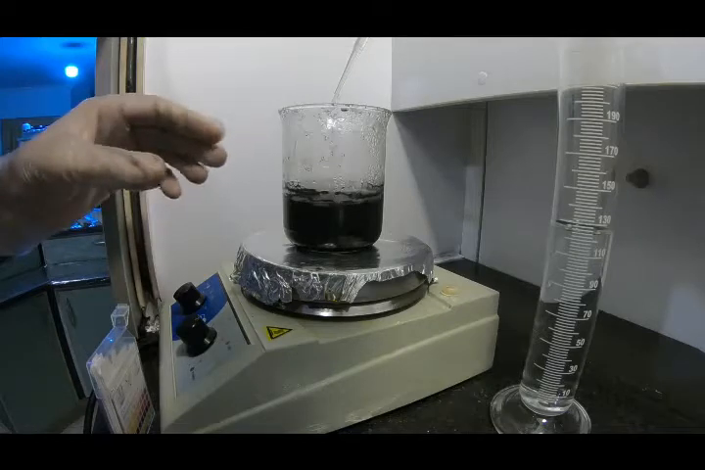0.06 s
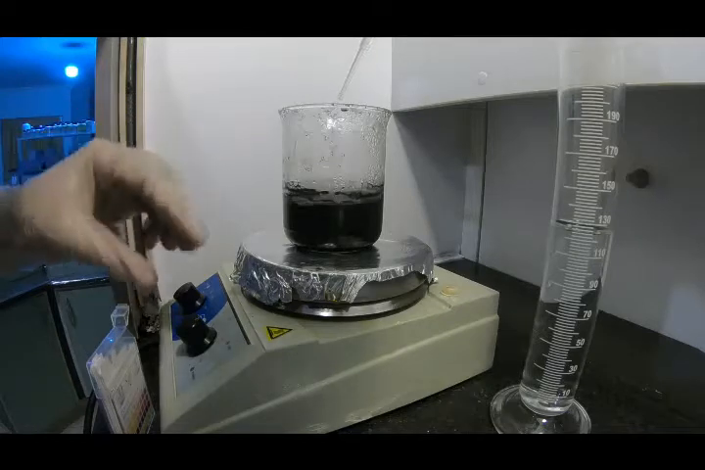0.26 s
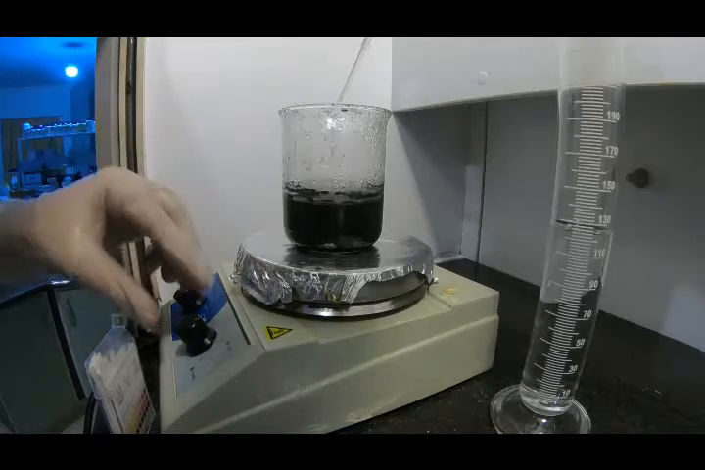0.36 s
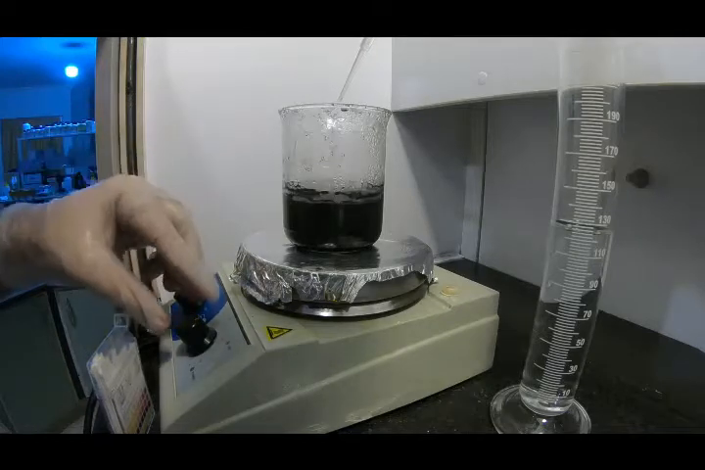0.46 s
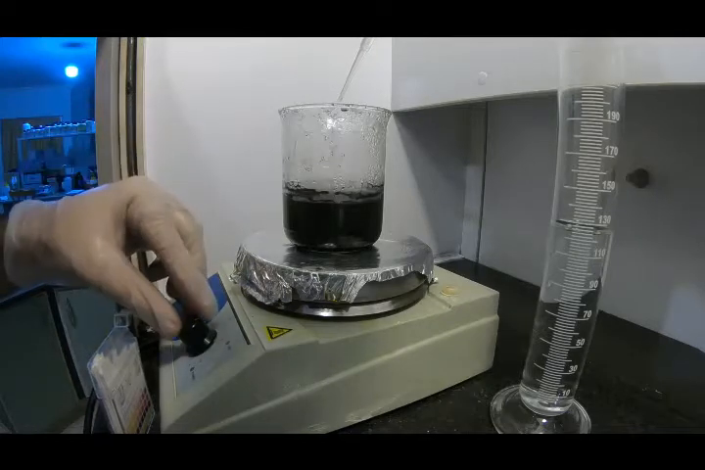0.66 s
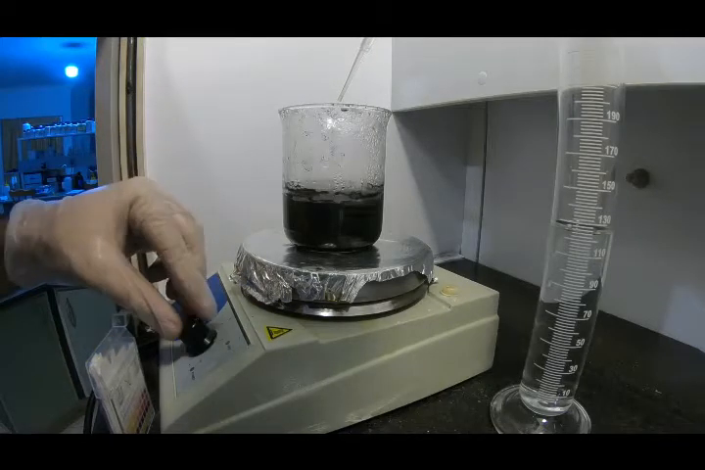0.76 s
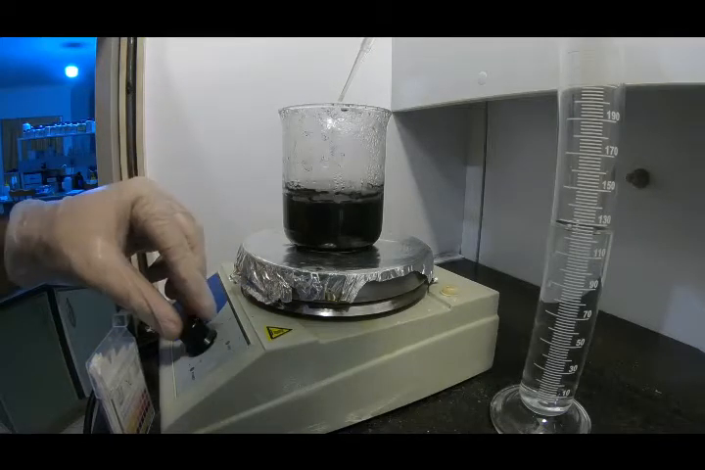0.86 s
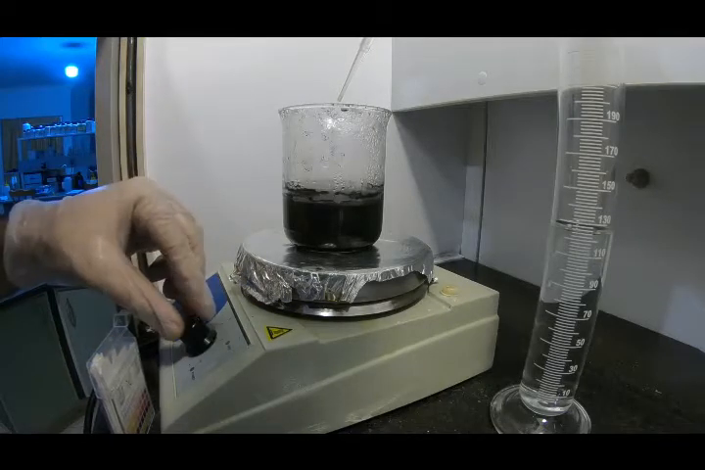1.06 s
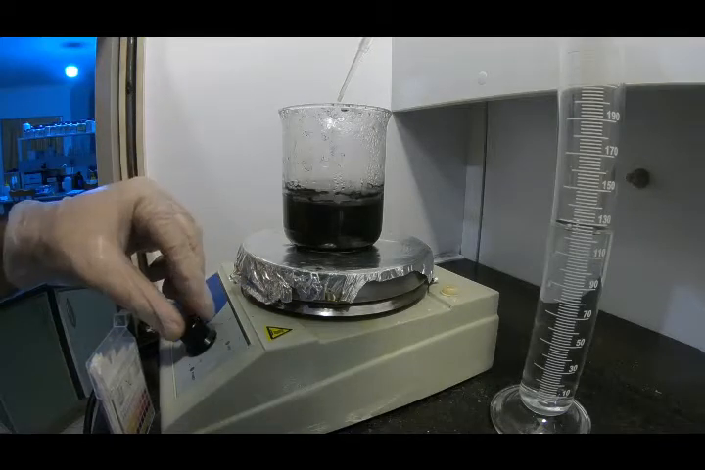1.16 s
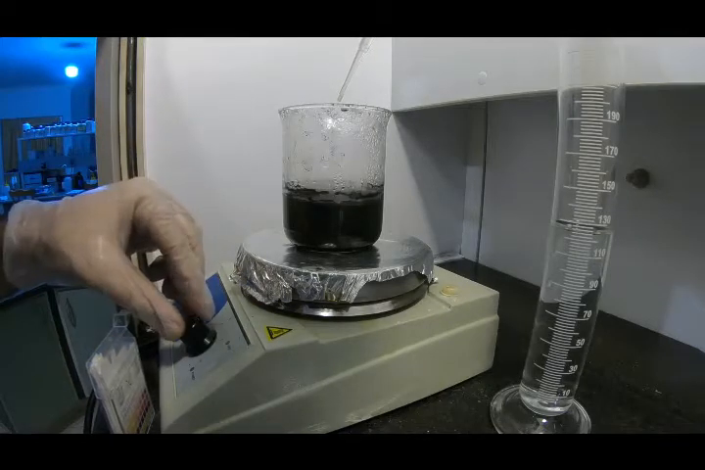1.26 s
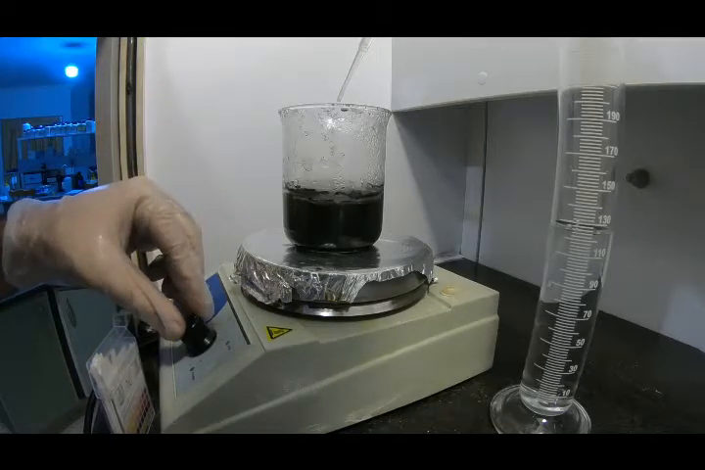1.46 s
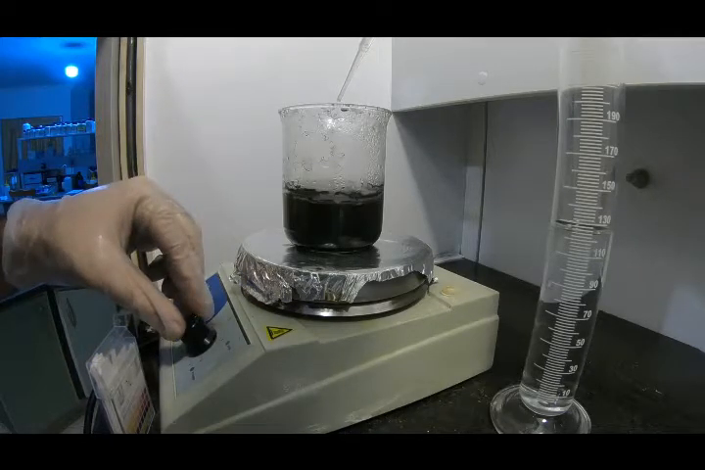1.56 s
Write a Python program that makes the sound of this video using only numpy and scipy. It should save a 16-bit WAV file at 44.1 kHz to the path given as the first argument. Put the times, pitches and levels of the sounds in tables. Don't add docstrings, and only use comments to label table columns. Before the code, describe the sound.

Glass beaker clinks from a tumbling stirring bar: light, quick ticks from 0 to 0.4 s, firmer clinks at 0.46 and 0.59 s, softer knocks to 0.8 s, then the loudest bright cluster at 0.84-1.0 s. A clear clink at 1.13 s, sparse faint taps and a tiny glassy squeak near 1.43 s follow. Unsteady low motor hum and faint fan hiss continue throughout, in a close, hard-walled space.

```python
import sys
import numpy as np
from scipy import signal
from scipy.fft import rfft, irfft, next_fast_len
from scipy.io import wavfile
from scipy.ndimage import map_coordinates

SR = 44100
rng = np.random.default_rng(int(sys.argv[2]) if len(sys.argv) > 2 else 0)


def invert_db(level):
    return 10 ** (np.asarray(level, dtype=float) / 20)


def transcribe(signal):
    frames = np.atleast_2d(signal).T
    limited = np.clip(frames, -1, 1)
    pcm = np.round(limited * 32767).astype(np.int16)
    wavfile.write(sys.argv[1], SR, pcm)


N = 70560

# start_s [s], level_db [dB]
SHAKE_LEVEL = [(0.0, -56), (0.016, -60), (0.208, -62), (0.23, -57.5), (0.342, -58), (0.378, -49.5),
               (0.49, -52.5), (0.524, -63), (0.588, -58.5), (1.016, -50.5), (1.108, -68), (1.162, -52),
               (1.314, -63), (1.6, -72)]
# pitch_hz [Hz], lead [radians]
LEFT_LEAD = [(145, 2.21), (550, 2), (850, 2.35), (1200, 2.5)]
# pitch_hz [Hz], left_over_right_db [dB]
BACKGROUND_PAN = [(30, -8), (60, -8), (150, -3), (350, -1), (800, -4), (1500, -.5), (8000, 0.5)]


def unit(x):
    return x / np.sqrt(np.mean(x ** 2) + 1e-20)


def along(points, hz):
    point_hz, value = np.transpose(points)
    return np.interp(np.log(hz + 1), np.log(point_hz + 1), value)


def curve(rows):
    s, value = np.transpose(rows)
    return np.interp(np.arange(N) / SR, s, value)


def wobble(rate_hz):
    knots = rng.standard_normal(int(N * rate_hz / SR) + 4)
    return map_coordinates(knots, [np.arange(N) * rate_hz / SR])


def filtered(x, response):
    m = next_fast_len(x.shape[-1] + 4096)
    spectrum = rfft(x, m) * response(np.fft.rfftfreq(m, 1 / SR))
    return irfft(spectrum, m)[..., :x.shape[-1]]


def paired(pair, alike):
    def mix(hz):
        turn = np.arccos(np.clip(along(alike, hz), -1, 1)) / 2
        return np.array([np.cos(turn), np.sin(turn)])

    mid, side = filtered(pair, mix)
    return np.array([mid + side, mid - side])


def panned(pair):
    return filtered(pair, lambda f: invert_db(np.outer([.5, -.5], along(BACKGROUND_PAN, f))))


def resonance(f, centre_hz, width_hz):
    return 1j * f * width_hz / (centre_hz ** 2 - f * f + 1j * f * width_hz)


def resonant(peaks):
    return lambda f: sum((-1) ** k * invert_db(db) * resonance(f, centre_hz, width_hz)
                         for k, (centre_hz, width_hz, db) in enumerate(peaks))


def bump(hz, centre_hz, octaves, skirt_db):
    hump = np.exp(-.5 * (np.log2((hz + 1) / centre_hz) / octaves) ** 2)
    return hump + invert_db(skirt_db) * hz ** 2 / (hz ** 2 + 1500 ** 2)


def walls():
    # pitch_hz [Hz], t60_s [s]
    decay = [(500, 0.18), (2000, 0.15), (3500, 0.12), (6000, 0.12), (12000, 0.056)]
    # pitch_hz [Hz], likeness [-1 to 1]
    alike = [(800, -0.61), (2500, 0.81), (4500, 0.54), (6500, 0.14), (8000, 0.033), (12000, 0.056)]
    rise_s, early_s, early_gain, direct_db = 0.004, 0.0033, 1, -20
    hz, frame_s, z = signal.stft(rng.standard_normal((2, SR // 4)), SR, nperseg=128)
    fading = z * invert_db(-60 * frame_s / along(decay, hz)[:, None])
    tail = paired(signal.istft(fading, SR, nperseg=128)[1], alike)
    t = np.arange(tail.shape[1]) / SR
    tail = tail * (1 - np.exp(-t / rise_s))
    tail = tail * (1 + early_gain * np.exp(-(t / early_s) ** 2 / 2))
    tail = tail / np.linalg.norm(tail[0])
    tail[:, 0] += invert_db(direct_db)
    return tail


def air():
    # pitch_hz [Hz], level_db [dB per Hz]
    fan_colour = [(25, -13), (100, -16.5), (220, -7), (500, -13), (700, -20), (1300, -13.5), (3700, -29.5),
                  (6100, -16.5),
                  (8500, -37), (15800, -50.5)]
    # pitch_hz [Hz], likeness [-1 to 1]
    alike = [(50, .2), (300, 0.023), (2000, 0.043), (8000, 0.14)]
    level_db, follow = -58, 0.37
    colour = np.array(fan_colour)
    hiss = filtered(rng.standard_normal((2, N)), lambda f: invert_db(along(colour, f)))
    hiss = panned(paired(hiss, alike))
    shake_db = curve(SHAKE_LEVEL)
    swell_db = 2.35 * wobble(5.73) + follow * (shake_db - shake_db.mean())
    return unit(hiss) * invert_db(level_db + swell_db)


def shaken(peaks, level_db):
    flutter_db = 1.5 * wobble(19.59)
    shake = rng.standard_normal((3, N)) * invert_db(flutter_db)
    modes = resonant(peaks)
    body = unit(filtered(shake, lambda f: modes(f) * np.abs(modes(f)))) * invert_db(level_db)
    common = filtered(body[0], lambda f: np.exp(.5j * np.outer([1, -1], along(LEFT_LEAD, f))))
    return panned(common + 0.83 * body[1:])


def hotplate():
    # pitch_hz [Hz], width_hz [Hz], level_db [dB]
    plate_modes = [(539.3, 33.3, -7), (813.3, 50.3, -2.5), (933, 31.6, -2.5), (1186, 35, -6)]
    # pitch_hz [Hz], width_hz [Hz], level_db [dB]
    casing_modes = [(58.7, 24, -2), (76, 49, -4), (144.6, 35.6, 0.5), (184, 62, -3.5)]
    # start_s [s], level_db [dB]
    motor_load = [(0.0, -51.5), (0.034, -52), (0.128, -59), (0.466, -51.5), (0.61, -59), (1.046, -51),
                  (1.1, -55.5), (1.25, -53), (1.448, -61.5), (1.466, -57), (1.6, -59)]
    plate_db = curve(SHAKE_LEVEL) + 1.5
    return shaken(plate_modes, plate_db) + shaken(casing_modes, curve(motor_load))


def whine():
    # start_s [s], level_db [dB]
    rubbing = [
        (0, -62.5),
        (1.1, -64),
        (1.19, -58),
        (1.3, -63.5),
        (1.39, -70),
        (1.425, -50.5),
        (1.48, -100),
        (1.6, -77.5),
    ]
    pitch_hz, width_hz, flutter_db = 6120, 330, 4
    mode = resonant([(pitch_hz, width_hz, 0)])
    noise = filtered(rng.standard_normal((2, N)), lambda f: mode(f) ** 2)
    pair = paired(noise, [(6000, 0.52)])
    return unit(pair) * invert_db(curve(rubbing) + flutter_db * wobble(34.1))


def ticks(shared):
    # start_s [s], level_db [dB]
    agitation = [
        (0.0, -52.5),
        (0.12, -74),
        (0.32, -54),
        (0.69, -64.5),
        (0.82, -43.5),
        (1.006, -51.5),
        (1.368, -69),
        (1.466, -76),
        (1.6, -95),
    ]
    per_s, spread_db, level_db = 300, 1.5, 4.5
    centre_hz, octaves = 5800, 1
    place, chance = rng.random((2, int(per_s * N / SR)))
    spikes = np.bincount((place * N).astype(int), invert_db(-spread_db * np.log(chance)), N)
    spikes = filtered(spikes, lambda f: bump(f, centre_hz, octaves, 12))
    effort = invert_db(curve(agitation))
    patter = signal.fftconvolve((unit(spikes) * effort)[None], shared, axes=1)[:, :N]
    return unit(patter) * invert_db(level_db) * np.sqrt(np.mean(effort ** 2))


def pings():
    # start_s [s], peak_db [dB], pitch_hz [Hz], t60_s [s]
    singing = [(.3718, -43, 2850, .08), (.3718, -41, 7650, .06), (.39, -42, 5200, .09),
               (.459, -46.5, 1900, .06), (.462, -45, 6170, .07), (.459, -42, 6670, .07),
               (.459, -33, 7600, .06), (.594, -36.5, 2900, .1), (.597, -34, 6530, .04),
               (.594, -37, 5150, 0.043), (.595, -45, 7650, .04), (.233, -41, 6550, .05),
               (.6644, -45, 2900, .08), (.725, -42, 6000, 0.045), (.7521, -39, 2230, .09),
               (.843, -39, 2900, .08), (.845, -31.5, 4300, .07), (.847, -37, 4600, .1),
               (.955, -46, 2900, .09), (.955, -35, 5100, .08), (.955, -34, 6620, .07),
               (.998, -33, 5210, .07), (.998, -32, 6160, .09), (1.0307, -52, 3480, .06),
               (1.128, -54, 1700, .06), (1.182, -41, 3500, 0.059), (1.1815, -37, 6180, .07),
               (1.2475, -49.5, 1720, .09), (1.2475, -38.5, 6180, .07), (1.519, -47.5, 5990, .06)]
    rise_s, neighbour_gain, beat_hz = .002, .5, 44.6
    out, t = np.zeros((2, N + SR)), np.arange(SR // 5) / SR
    for s, db, hz, t60 in singing:
        turn, apart, left, right = rng.standard_normal(4)
        mode = np.sin(2 * np.pi * hz * t + 9 * turn)
        ear_phase = 9 * np.array([[left], [right]])
        neighbour = np.sin(2 * np.pi * (hz + beat_hz * apart) * t + ear_phase)
        envelope = invert_db(db - 60 * t / t60) * (1 - np.exp(-t / rise_s))
        out[:, round(s * SR):][:, :len(t)] += envelope * (mode + neighbour_gain * neighbour)
    return out[:, :N]


def blows(rows, shared):
    # pitch_hz [Hz], level_db [dB], t60_s [s]
    glass_modes = [(780, -36, 0.049), (900, -28, 0.14), (1700, -2, 0.053), (2180, -29, 0.054),
                   (2900, -0.5, 0.047), (3720, -3, 0.051), (3870, -29, 0.024), (4460, -37, 0.067),
                   (5240, 0, 0.11), (5210, -16, 0.2), (6200, -26, 0.12), (6230, -16, 0.13),
                   (6500, -17, 0.043), (6700, 3.5, 0.077),
                   (7560, -36, 0.3), (7200, -36, 0.11), (7560, 1.5, 0.069)]
    contact_s, echo_vary = .0004, 1.2
    ring_gain_db, ring_rise_s = -12.5, 0.0014
    out, t = np.zeros((2, N + SR)), np.arange(SR // 5) / SR
    hz, level_db, t60 = np.array(glass_modes).T[:, :, None]
    lead_points = np.vstack([LEFT_LEAD, [(2000, 0.44), (6000, 0.58), (8000, 0.58)]])
    lead = along(lead_points, hz) / 2
    for s, db, at_hz, octaves, skirt_db, ring_db in rows:
        burst = rng.standard_normal(len(t)) * invert_db(-60 * t / contact_s)
        click = filtered(np.pad(burst, (300, 0)), lambda f: bump(f, at_hz, octaves, skirt_db))
        click = click / np.linalg.norm(click)
        echo = (shared + echo_vary * walls()) / np.sqrt(1 + echo_vary ** 2)
        heard = signal.fftconvolve(click[None], echo, axes=1) * 8
        luck, phase = rng.standard_normal((2, len(hz), 1))
        size = invert_db(level_db + 5.5 * luck - 60 * t / t60) * np.sqrt(bump(hz, at_hz, octaves, skirt_db))
        ring = np.array([(size * np.sin(2 * np.pi * hz * t + 9 * phase + side * lead)).sum(0)
                         for side in (1, -1)])
        ring = ring * (1 - np.exp(-t / ring_rise_s))
        heard[:, 300:][:, :len(t)] += invert_db(ring_gain_db + min(ring_db, 1)) * ring
        out[:, round(s * SR) - 400:][:, :heard.shape[1]] += invert_db(db) * heard
    return out[:, :N]


def contacts(shared):
    # start_s [s], peak_db [dB], click_hz [Hz], ring_db [dB]
    clinks = [(0.0208, -34.5, 6850, -11.5), (0.0984, -43, 7506, -7), (0.157, -41.5, 5830, -31),
              (.228, -37, 6530, -20), (0.233, -32, 6960, -11.5), (0.2761, -33, 6700, -11),
              (0.297, -38.5, 7668, -6), (0.346, -41.5, 5420, -16), (0.3698, -30, 7260, -6),
              (0.39, -33.5, 5850, -32), (0.411, -38, 5700, -12), (0.424, -39, 3380, -15),
              (0.4374, -32.5, 5850, -22), (0.46, -23, 7200, -13.5), (0.594, -23.5, 6700, -34),
              (0.725, -38.5, 5500, -22), (0.753, -26.5, 4820, -27), (0.777, -40, 7240, -12),
              (0.8214, -31, 5093, -10), (.838, -27, 5000, -20), (0.8427, -15, 6200, -12.5),
              (1, -19, 4954, -12), (0.8667, -31, 8100, -8), (0.91, -28, 6700, -15), (0.938, -37, 6650, -9),
              (0.9556, -17.5, 7344, -16), (.964, -29.5, 6000, -25), (1.0, -23, 5440, -13),
              (1.008, -31.5, 5800, -22), (1.0846, -41.5, 4630, -6), (1.116, -38.5, 6500, -15),
              (1.13, -24, 6850, -16), (1.165, -41, 6200, -18), (1.519, -47, 6150, -23)]
    # start_s [s], peak_db [dB], centre_hz [Hz], width [octaves]
    knocks = [(.0207, -40.5, 5280, 0.12), (0.12, -40, 4100, 0.99), (0.2, -43, 2060, 0.81),
              (1.37, -42, 5860, 0.028), (1.191, -44, 1300, 0.21), (1.1, -28, 15000, 0.36),
              (0.6, -36, 2950, 0.19), (1.372, -57, 2800, .1), (1.4, -58.5, 3200, .1),
              (1.59, -55, 2360, .15), (1.05, -47.5, 3000, 0.56), (0.641, -29, 4200, 0.44),
              (0.664, -37.5, 2640, 0.42), (0.6919, -36, 2270, 0.38), (.735, -50, 14000, .3),
              (0.7515, -33.5, 2640, 0.38), (0.7985, -32, 3600, 0.32), (0.842, -25, 4500, 0.13),
              (0.886, -23, 12200, 0.92), (0.922, -24, 12800, 0.4), (0.9567, -39, 3800, 0.23),
              (.866, -29, 11600, 0.48), (0.9989, -45, 3900, 0.45), (.843, -35.5, 3200, .3),
              (1.1493, -38, 1140, 0.14), (1.1813, -32.5, 6030, 0.099), (1.1819, -36.5, 3500, 0.21),
              (1.2473, -41, 1880, 0.3), (1.2475, -41, 6000, 0.1), (1.2475, -41, 3500, 0.38),
              (1.292, -42.5, 2300, 0.87), (1.325, -47.5, 14000, 0.28), (1.519, -49.5, 5300, 0.059),
              (1.519, -58, 2030, 0.12)]
    click_octaves, skirt_db = 0.35, -9
    rows = [(s, db, hz, click_octaves, skirt_db, ring_db) for s, db, hz, ring_db in clinks]
    rows += [(s, db, hz, octaves, -30, -30) for s, db, hz, octaves in knocks]
    return blows(rows, shared)


def beaker(f):
    # pitch_hz [Hz], width_hz [Hz], level_db [dB]
    body_modes = [(1720, 150, -4), (2900, 150, 1.5), (3383, 200, -2), (4250, 250, -3.5), (4600, 200, -1),
                  (5150, 300, 4), (5830, 200, -3), (6180, 180, 2), (6650, 300, 5), (7050, 150, -3),
                  (7350, 150, 0.5), (7640, 220, 6), (8300, 200, 0)]
    base_db = -7
    return invert_db(base_db) + sum(invert_db(db - 4.5) * resonance(f, centre_hz, width_hz)
                              for centre_hz, width_hz, db in body_modes)


def scene():
    # pitch_hz [Hz], level_db [dB]
    mic = [(1700, 2.5), (2350, -1.5), (3200, -1), (7000, 1.5), (7900, -2.5), (8600, -10.5), (11000, -14),
           (15000, -22)]
    pan_db = -0.5
    shared = walls()
    glass = filtered(contacts(shared) + ticks(shared), beaker)
    glass = glass + pings() + whine()
    glass = filtered(glass, lambda f: invert_db(along(mic, f)))
    glass = glass * invert_db([[pan_db / 2], [-pan_db / 2]])
    return glass + hotplate() + air()


def low_pass(x):
    return signal.sosfilt(signal.butter(12, 15900, fs=SR, output="sos"), x)


def record(dry):
    mix = filtered(dry, lambda hz: hz < 15750)
    return low_pass(mix)


dry = scene()
out = record(dry)
transcribe(out)
```